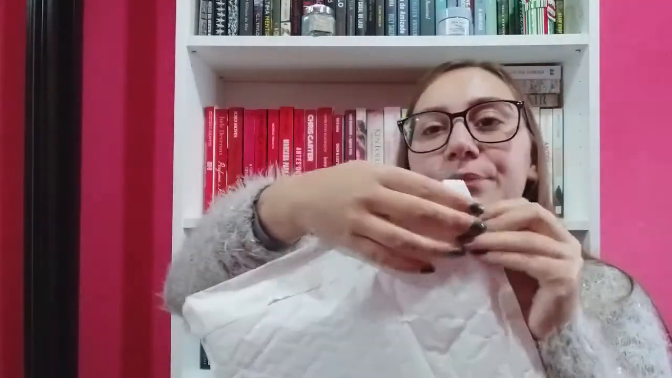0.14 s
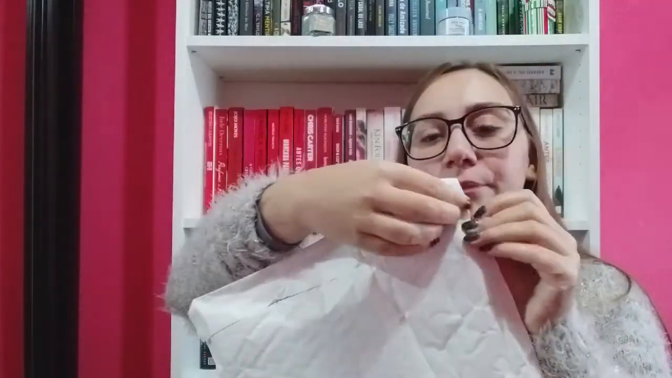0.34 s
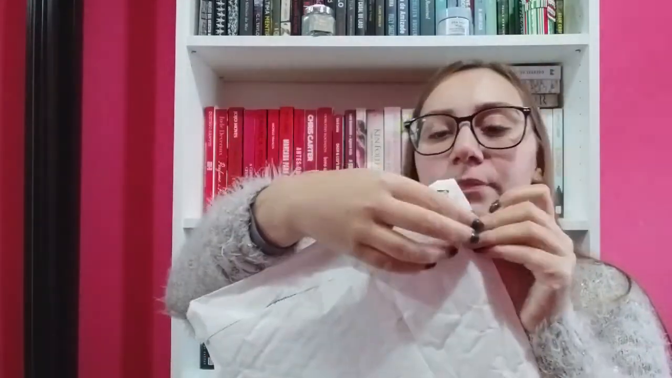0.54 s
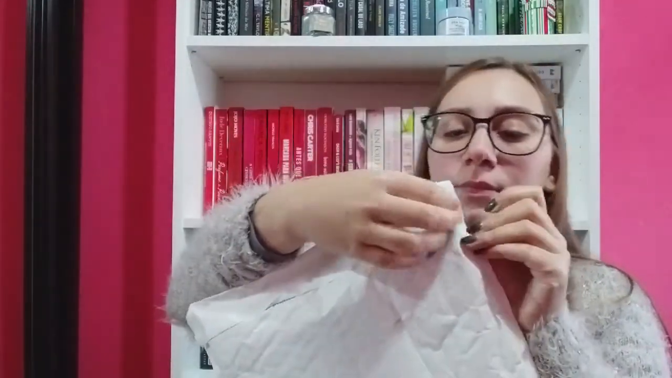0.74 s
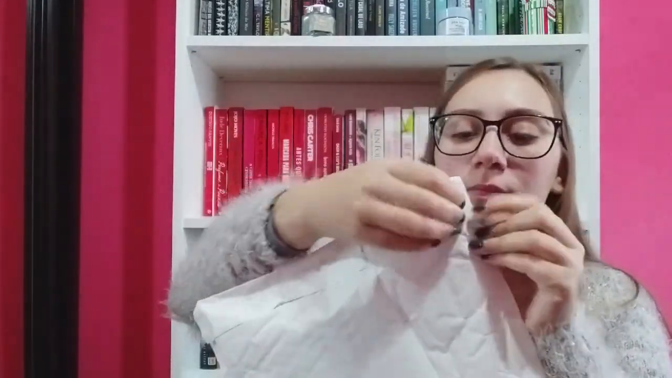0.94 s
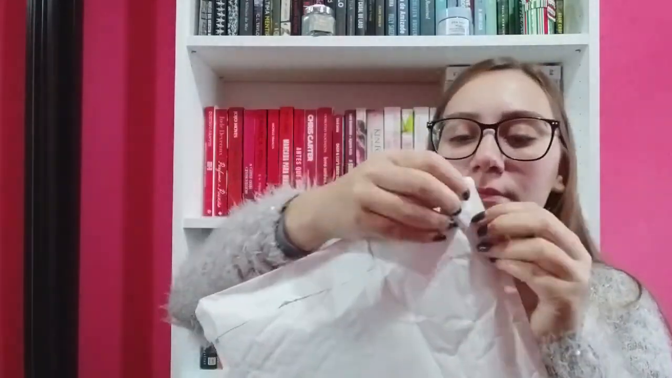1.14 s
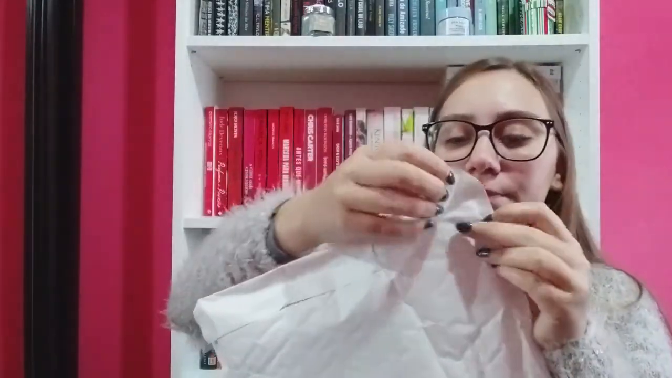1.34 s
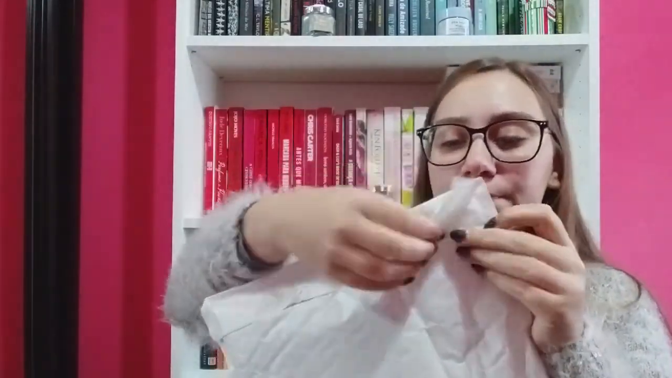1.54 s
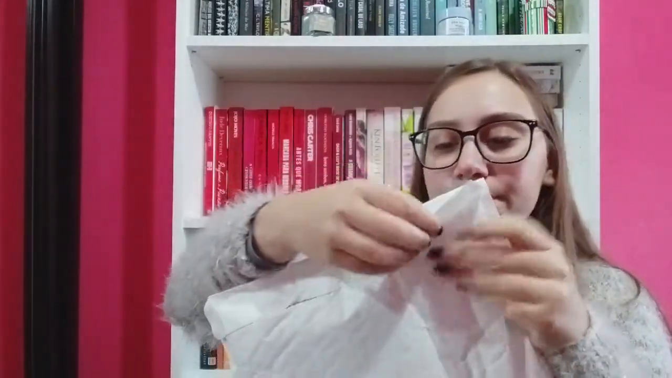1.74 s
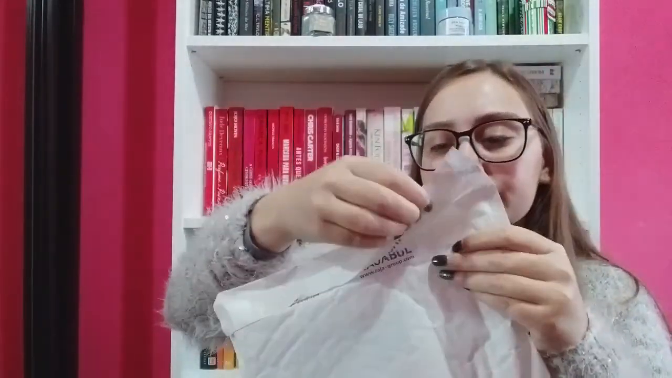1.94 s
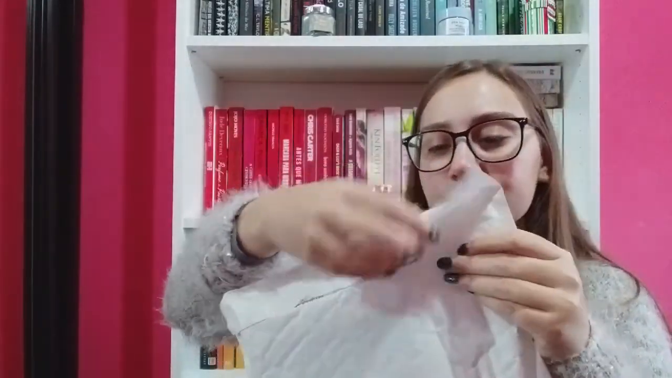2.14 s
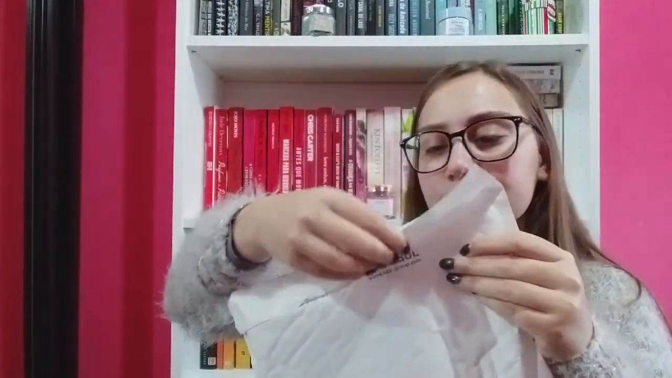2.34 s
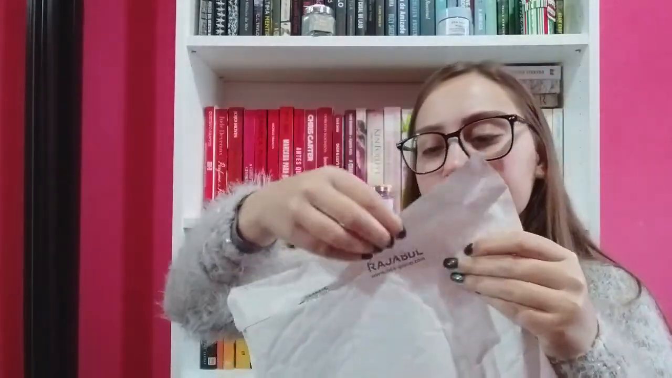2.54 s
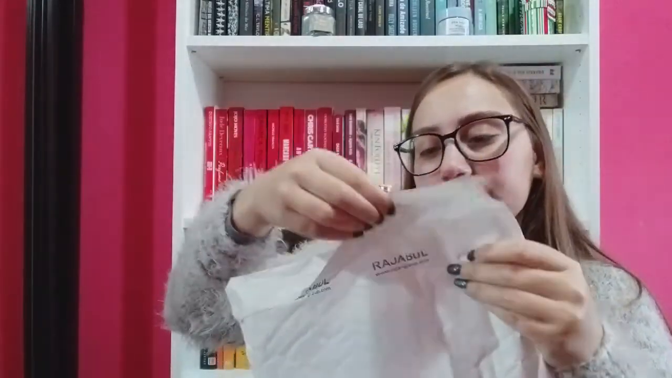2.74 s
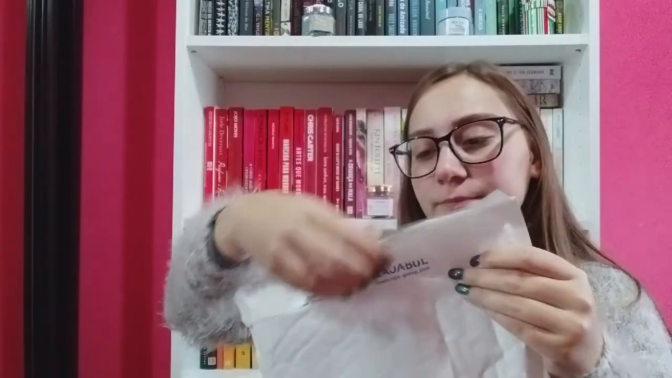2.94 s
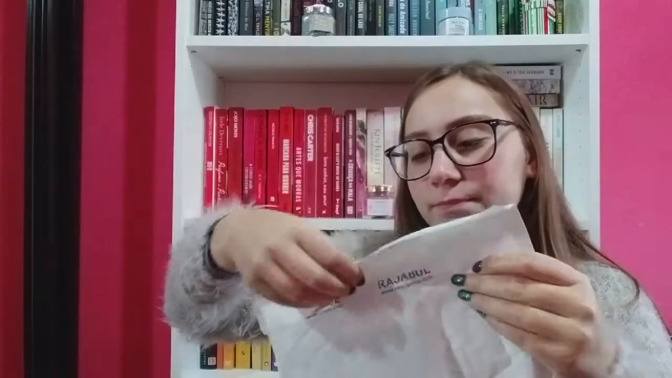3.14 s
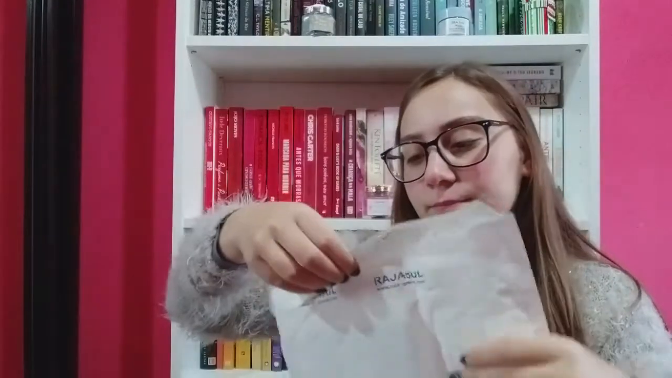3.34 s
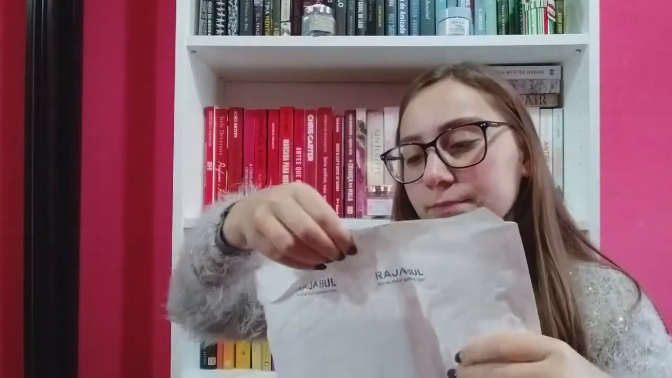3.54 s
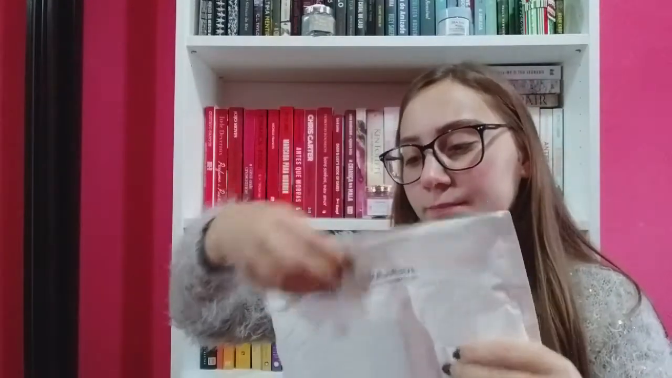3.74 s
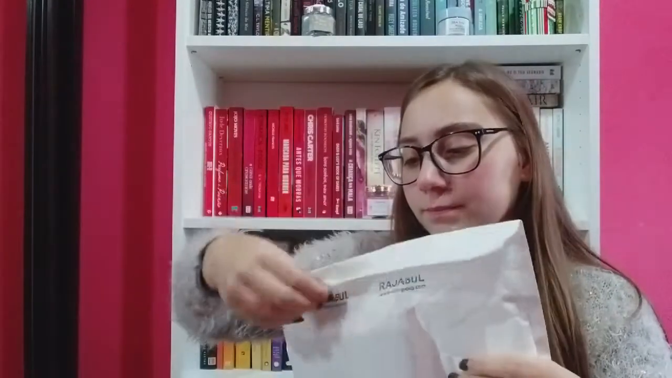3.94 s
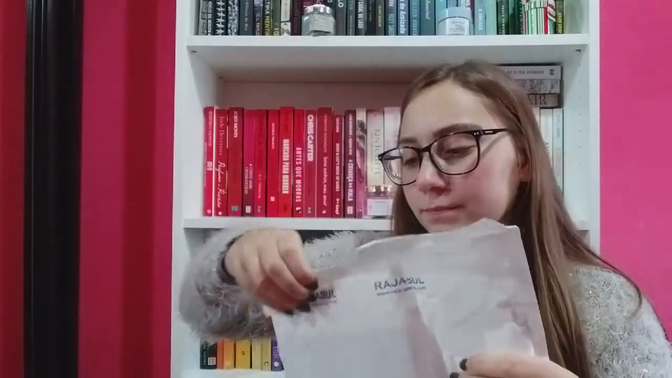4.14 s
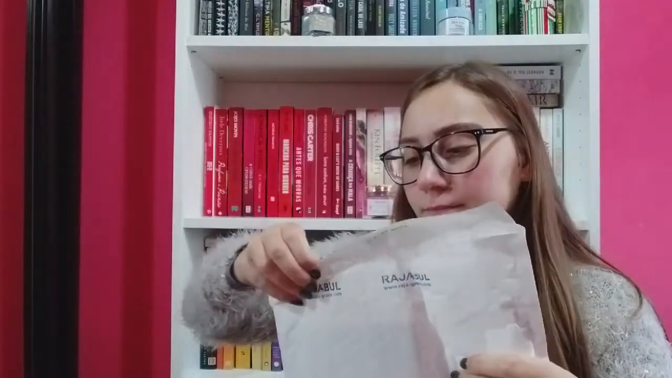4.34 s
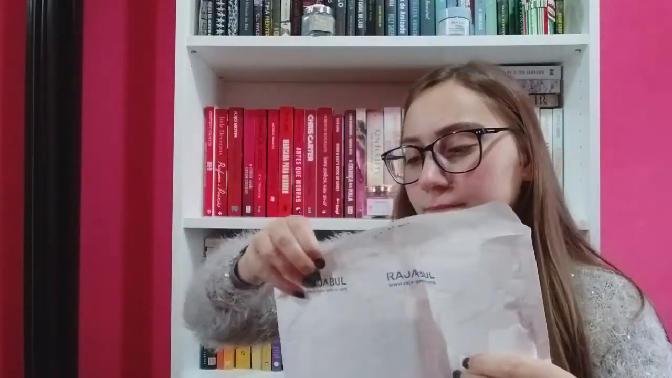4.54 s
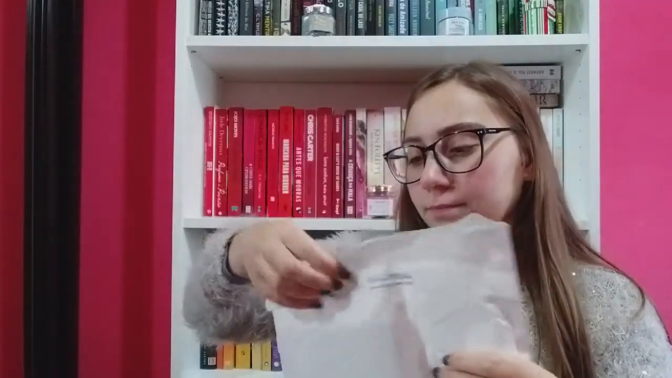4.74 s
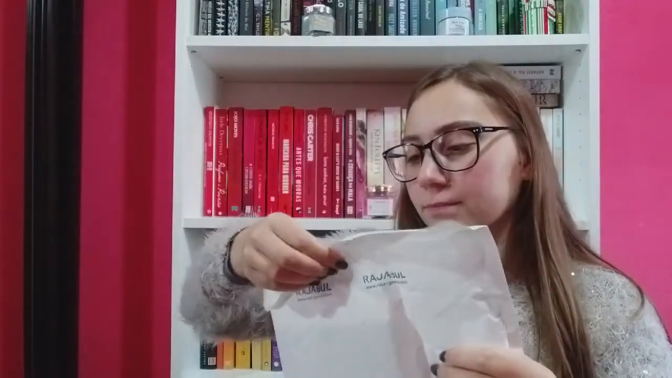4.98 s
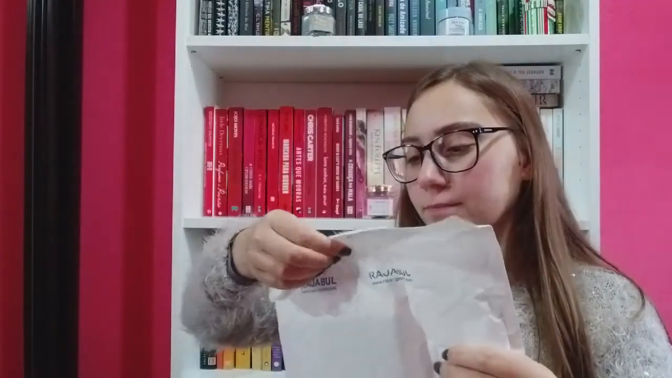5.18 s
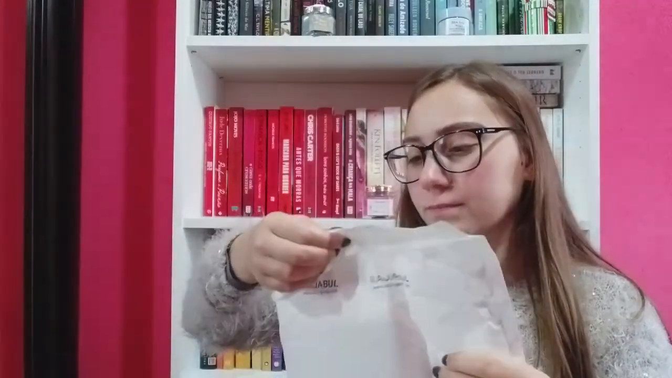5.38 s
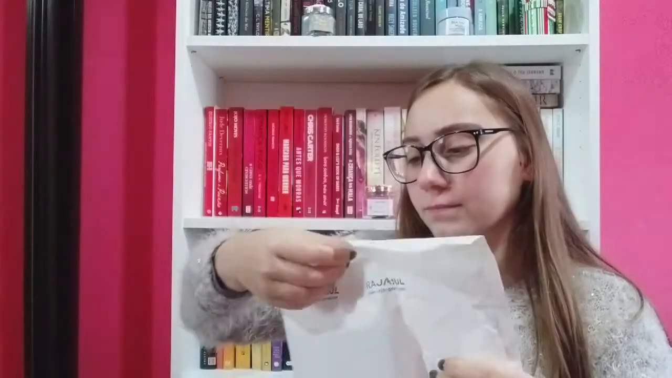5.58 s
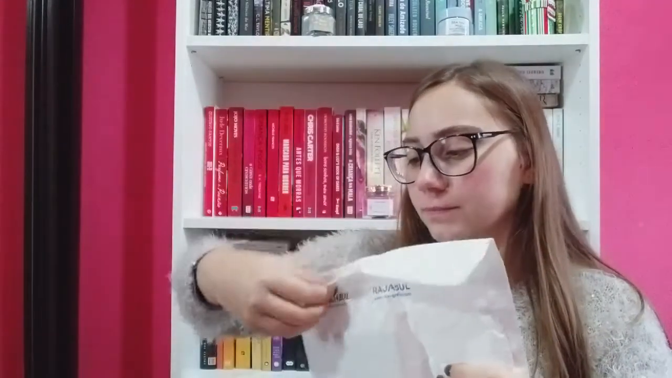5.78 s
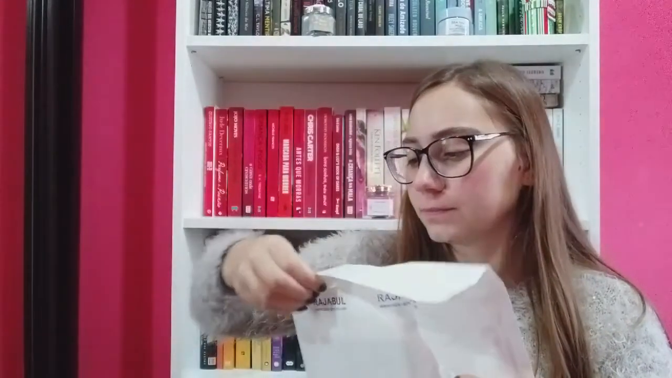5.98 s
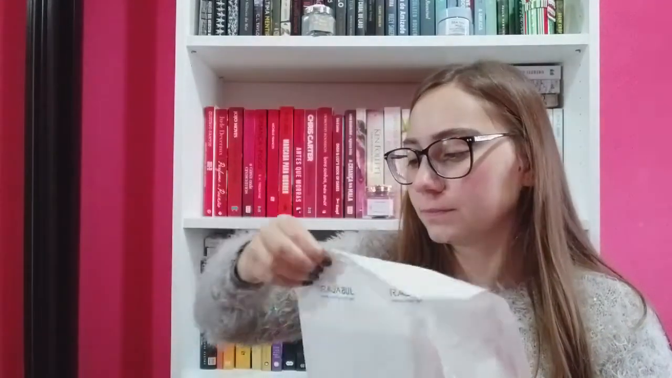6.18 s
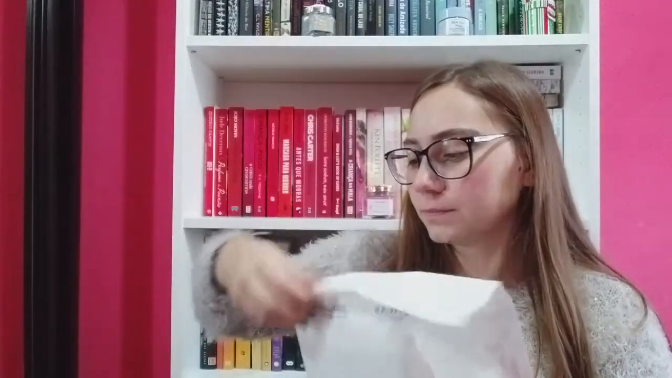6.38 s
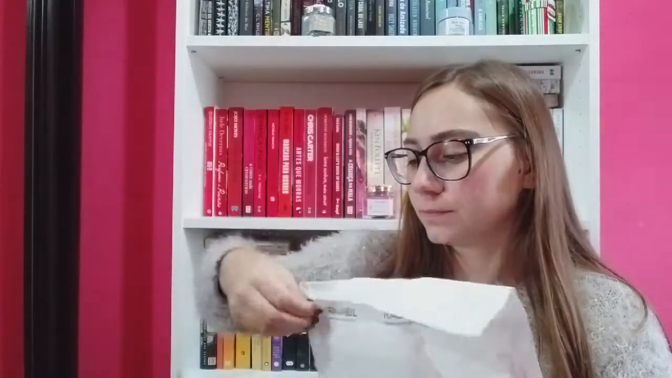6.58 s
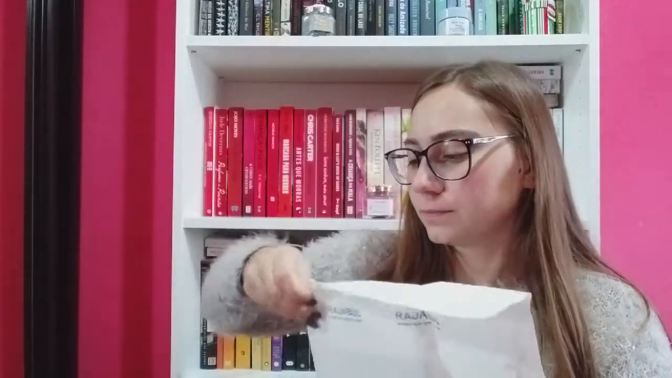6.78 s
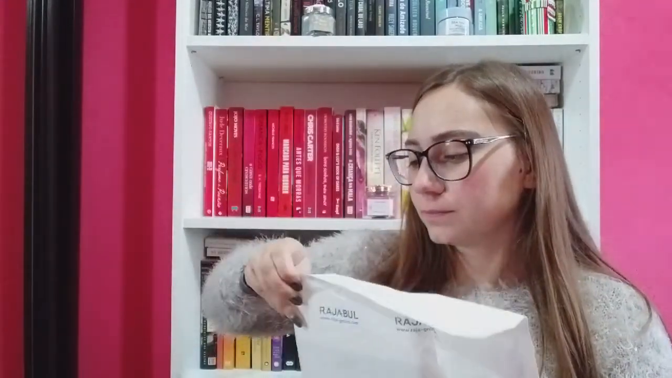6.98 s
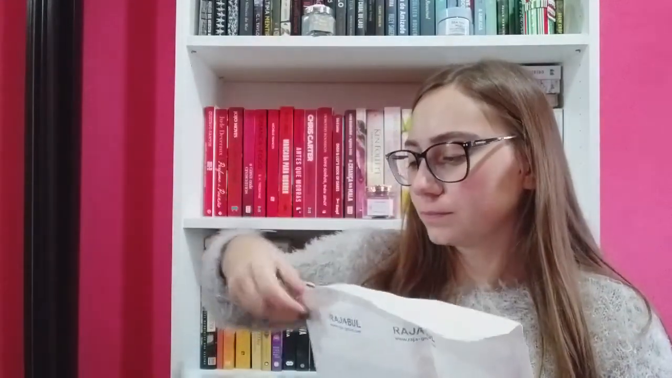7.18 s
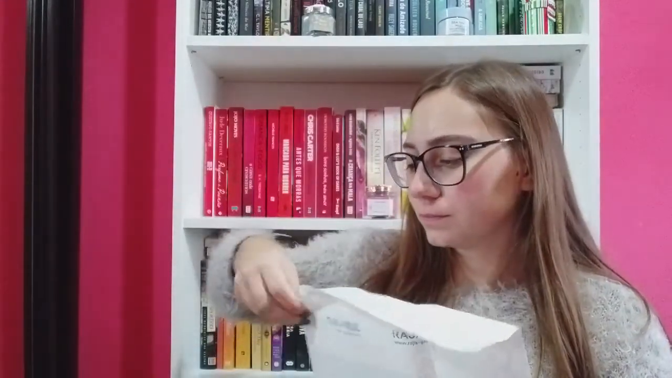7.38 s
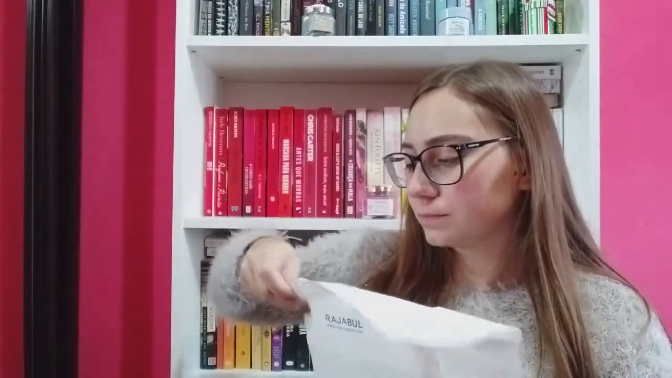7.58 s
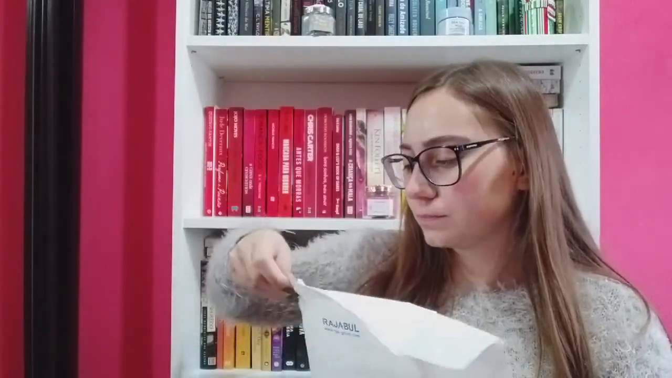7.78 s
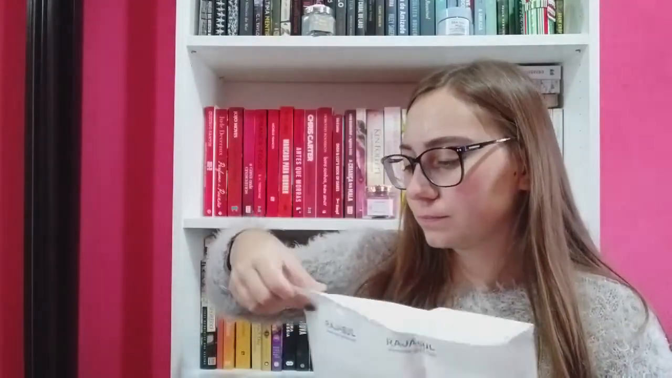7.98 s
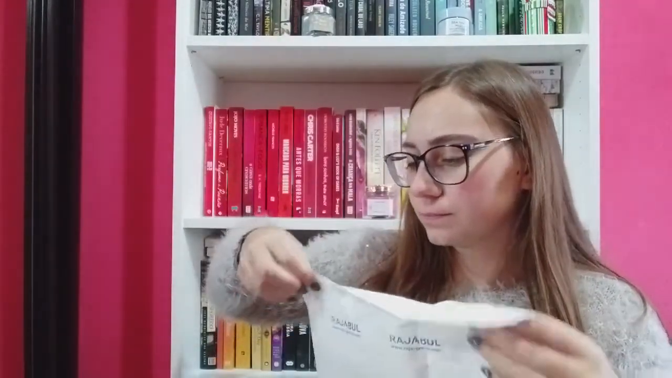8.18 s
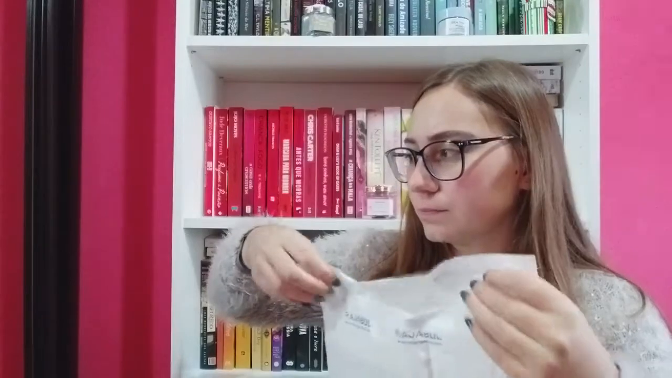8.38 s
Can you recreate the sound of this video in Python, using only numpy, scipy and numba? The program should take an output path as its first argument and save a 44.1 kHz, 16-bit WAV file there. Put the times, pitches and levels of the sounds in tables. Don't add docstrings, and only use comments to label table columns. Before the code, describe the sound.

Hands pull open a stiff padded paper envelope up close, with crisp crackles, sharp snaps and hollow panel pops over faint room hum.

```python
import sys
import numpy as np
from scipy import signal
from scipy.fft import rfft, irfft
from scipy.io import wavfile
from scipy.ndimage import uniform_filter1d
from numba import njit

SR = 44100
rng = np.random.default_rng(int(sys.argv[2]) if len(sys.argv) > 2 else 0)


def file_out(sig):
    cols = np.atleast_2d(sig).T
    lim = np.clip(cols, -1, 1)
    pcm = np.round(lim * 32767).astype(np.int16)
    wavfile.write(sys.argv[1], SR, pcm)


def invert_db(x):
    u = np.asarray(x, float) / 20
    return 10 ** u


N = 371322
SNAP_DELAY_S = .001


def level(x, db):
    return x * invert_db(db) / np.sqrt(np.mean(x ** 2))


def colour(x, points):
    hz, db = np.transpose(points)
    grid_hz = np.maximum(np.fft.rfftfreq(4096, 1 / SR), 1)
    gain_db = np.interp(np.log(grid_hz), np.log(hz), db)
    cepstrum = irfft(np.log(invert_db(gain_db)))
    cepstrum[1:2048] *= 2
    cepstrum[2049:] = 0
    response = irfft(np.exp(rfft(cepstrum)))
    return signal.fftconvolve(x, response)[:len(x)]


def band(x, hz, width_hz):
    return signal.lfilter(*signal.iirpeak(hz, hz / width_hz, fs=SR), x)


def thin(x, hz):
    return signal.sosfilt(signal.butter(2, hz, "high", fs=SR, output="sos"), x)


def walk(rate_hz):
    hold = int(SR / rate_hz)
    steps = np.repeat(rng.standard_normal(N // hold + 1), hold)
    return 1.31 * uniform_filter1d(steps, hold)[:N]


@njit
def grains(s, size, hz, cycles):
    out = np.zeros(N + 9000)
    for k in range(len(s)):
        turn = np.exp((2j * np.pi - np.log(1000.) / cycles[k]) * hz[k] / SR)
        z = size[k] + 0j
        first = int(s[k] * SR)
        last = first + min(int(cycles[k] * SR / hz[k]), 8000)
        for i in range(first, min(last, len(out))):
            z *= turn
            out[i] += z.imag
    return out[:N]


def crackle(count, hz, octaves, cycles, scatter_db, flurry_db):
    when, side = rng.random((count, 2)).T
    centre_hz = np.broadcast_to(hz, N)[(when * N).astype(int)]
    pitch_hz = np.clip(centre_hz * 2 ** (octaves * rng.standard_normal(count)), 60, .42 * SR)
    size = np.sign(side - .5) * invert_db(scatter_db * np.minimum(rng.exponential(size=count), 4))
    size = size * np.sqrt(pitch_hz / centre_hz)
    small_breaks = grains(when * N / SR, size, pitch_hz, np.full(count, cycles))
    return level(small_breaks * invert_db(flurry_db), 0)


def hum():
    # [Hz, dB per Hz]
    spectrum = [(13, -48), (22, -13), (53, -6), (64, -7.5), (85, -2.5), (211, -13.5), (457, -17.5),
                (961, -28), (5170, -22), (16000, -54)]
    return level(colour(rng.standard_normal(N), spectrum), -57.5)


def room(x, places=16):
    # [s, dB]
    echoes = [
        (.0006, -11),
        (.0021, -8),
        (.0066, -13),
        (.0116, -11),
    ]
    # [Hz, s, dB]
    tail_bands = [(300, 0.32, -2.5), (1440, 0.18, -5), (4930, 0.13, -8), (12370, 0.13, -10)]
    t = np.arange(SR // 2) / SR
    swell = np.minimum(t / .008, 1) * (1 - 2 * t)
    share = invert_db(68.0 * np.array([walk(14) for _ in range(places)]))
    out = x
    for part in x * share / np.sqrt(np.sum(share ** 2, axis=0)):
        tail = 0
        for hz, t60_s, db in tail_bands:
            decay = invert_db(-60 * t / min(t60_s, .4))
            wash = band(rng.standard_normal(len(t)), hz, 1.4 * hz) * decay * swell
            wash = wash / np.sqrt(np.sum(wash ** 2))
            tail = tail + invert_db(db) * wash * np.sqrt(2.07 * hz / SR)
        for lag_s, db in echoes:
            tail[int((lag_s + .0004 * rng.random()) * SR)] += invert_db(db)
        out = out + signal.fftconvolve(part, tail)[:N]
    return out


def swings():
    # [s, dB, Hz]
    thuds = [(0.986, -35, 121), (1.24, -38, 96.9), (2.764, -47, 51.1), (2.767, -28, 177),
             (2.956, -25.5, 160), (3.351, -38, 121), (3.841, -52, 199), (3.843, -32, 168),
             (4.063, -30.5, 168), (4.715, -36, 159), (4.964, -32, 177.6), (5.292, -41, 196),
             (6.195, -31, 187), (6.413, -38, 183.8), (6.867, -43, 156), (6.979, -38, 191),
             (7.619, -38, 121), (8.084, -49.5, 136)]
    s, db, hz = np.transpose(thuds)
    return band(grains(s, invert_db(db + 6.5), hz, np.full(len(s), 6.)), 187.0, 160.0)


def pops():
    # [s, dB, Hz]
    panel_pops = [(0.192, -28, 900), (0.321, -28.5, 554), (0.97, -28.5, 460), (1.477, -30.5, 430),
                  (1.508, -24, 900), (1.745, -21, 1010), (1.853, -21, 960), (1.272, -31, 434),
                  (2.411, -30, 450), (2.716, -22.5, 437), (2.776, -15, 442), (2.956, -30, 580),
                  (4.043, -18, 1330), (4.564, -26.5, 440), (4.717, -27, 570), (4.808, -21.5, 840),
                  (4.856, -17, 490), (4.971, -22.5, 820), (5.037, -19, 445), (5.302, -15, 342),
                  (5.449, -27, 810), (5.555, -25, 570), (5.947, -26, 456), (6.398, -26, 860),
                  (6.982, -26, 1010), (7.202, -17, 845), (7.629, -19, 575), (8.09, -24.5, 483.6),
                  (8.186, -23, 900), (8.312, -22.5, 880),
                  (0.361, -38, 458), (1.066, -38, 450), (1.112, -40, 1070), (1.298, -34, 426),
              (1.923, -26.5, 473), (2.004, -23.5, 433), (2.097, -35, 902), (2.152, -37, 431),
              (2.202, -31.5, 410), (2.513, -29.5, 441), (3.343, -33, 484), (3.799, -21.5, 864),
              (3.849, -28, 554), (3.949, -46, 447), (4.055, -24, 418), (4.074, -25, 1270), (4.1, -33, 490),
              (4.171, -33.5, 398), (4.316, -30, 850), (4.753, -38, 872), (4.933, -25, 471),
              (4.994, -25, 571), (5.514, -30, 880), (5.831, -30.5, 574), (6.112, -25, 877),
              (6.417, -23.5, 460), (6.433, -23, 476), (6.95, -35.5, 1230), (7.046, -26, 565),
              (7.107, -27.5, 1010), (7.224, -23, 900), (7.353, -24, 1010), (7.76, -28, 1300),
              (7.795, -36, 458), (8.039, -30.5, 495)]
    # [s, dB, 1]
    stages = [
        (.002, 4.5, 1.2),
        (.004, -7.5, 2),
        (.009, -27.5, .94),
    ]
    s, db, hz = np.transpose(panel_pops)
    flips = 0
    for lag_s, gain_db, ratio in stages:
        flips = flips + grains(s + lag_s, invert_db(db + gain_db), hz * ratio, np.full(len(s), 8.))
    return thin(flips, 146.0)


def strong_breaks():
    # [s, dB, Hz, dB]
    cracks = [(0.812, -17, 3220, -4.5), (.9692, -15.5, 3030, -22), (1.0669, -20.5, 3020, -2),
              (1.2341, -15, 3370, -5), (1.911, -16, 1437, -13), (1.9345, -10.5, 6100, -4),
              (2.0399, -16, 5400, -2.5), (2.15, -19.5, 2350, -8), (2.2119, -16, 3500, -14),
              (2.695, -15, 3560, -21), (2.7826, -1, 5140, -5), (2.9212, -9, 2950, -3),
              (4.0427, 0.5, 4900, -14), (4.234, -16, 4770, -9), (4.346, -23, 7060, 2.5),
              (5.214, -5.5, 6090, -4.5), (5.2617, -12, 5950, -5), (5.5134, -25, 4140, -24),
              (6.1323, -20, 5030, -3), (6.776, -9, 3400, -9.5), (6.8552, -3, 3850, -16),
              (7.3531, -7, 2670, -41), (7.49, -22, 6700, -7), (4.7208, -15, 2860, -18),
              (7.8137, -17.5, 3500, -20), (7.314, -26, 4500, -22)]
    # [s, dB, Hz]
    ticks = [(.194, -16.5, 3830), (1.2152, -15, 5300), (1.6418, -9.5, 4070), (1.8537, -17, 5400),
             (1.9583, -13, 3950), (2.2447, -5.5, 4970), (2.485, -16.5, 4090), (2.5274, -5, 4300),
             (2.699, -8, 6960), (2.8718, -28, 5300), (3.3417, -18.5, 3630), (3.4447, -14, 4900),
             (3.535, -3, 4250), (3.773, -15.5, 3570), (4.0545, -5, 3340), (4.481, -23, 4730),
             (4.7321, -11, 4793), (4.9238, -12, 3500), (4.9915, -15, 6260), (5.0429, -10.5, 6300),
             (5.6902, -12, 6600), (5.7534, -9, 3760), (6.3998, -13, 5520), (7.5235, -12.5, 6700),
             (7.6092, -16, 5830), (7.866, -14.5, 3850), (8.312, -12.5, 4700), (6.0454, -16, 6200)]
    # [s, dB, Hz]
    folds = [(1.4085, -19.5, 1680), (1.4735, -23.5, 2160), (1.5081, -19, 1560), (1.7457, -19, 1700),
             (1.8043, -20, 1280), (2.0048, -9, 2410), (2.0977, -25.5, 1570), (2.387, -19, 2620),
             (2.7166, -1.5, 2910), (2.958, -18, 1740), (3.1304, -11, 2100), (3.439, -11, 2900),
             (3.6333, -11, 1750), (3.894, -12, 2840), (4.0733, -11.5, 1620), (4.565, -3.5, 2850),
             (4.7541, -15.5, 1720), (4.846, -15, 2100), (4.971, -18.5, 1480), (5.8576, -9.5, 3340),
             (5.947, -11, 2920), (6.4207, -18.5, 2300), (6.443, -9.5, 1570), (6.6849, -19, 1440),
             (7.211, -14, 2800), (7.2218, -14, 825), (7.6306, -4, 2000), (8.1274, -13.5, 2040),
             (8.1328, -4, 2560), (0.89, -28, 1180)]
    tick_treble_db, fold_treble_db = -24, -29
    return cracks + [(*r, tick_treble_db) for r in ticks] + [(*r, fold_treble_db) for r in folds]


def small_breaks():
    # [s, dB, Hz]
    pricks = [(0.362, -22.5, 5120), (0.712, -32, 1640), (0.758, -24, 6900), (0.907, -26, 2040),
              (1.052, -21, 6010), (1.112, -21, 1630), (1.169, -21, 5780), (1.185, -16, 7520),
              (1.195, -17, 5130), (2.053, -20, 4110), (2.581, -26, 4780), (3.415, -13, 3530),
              (3.476, -13, 4280), (3.749, -18.5, 3150), (3.789, -16, 3920), (4.936, -17, 1720),
              (5.166, -22, 3820), (5.604, -18, 4140), (5.638, -28, 5190), (5.763, -15, 2190),
              (5.961, -13, 2060), (6.732, -24, 2000), (7.76, -20, 1320), (7.896, -17.5, 1323),
              (7.944, -20.5, 6540),
              (0.956, -31, 3590), (1.174, -24, 5120), (1.728, -27, 1720), (2.6514, -36, 5180),
             (2.722, -3, 6270), (2.7564, -9, 5260), (2.8833, -19, 6100), (3.3477, -15.5, 3560),
             (3.88, -15, 2890), (4.0989, -21, 1680), (4.463, -23, 5200), (4.911, -14, 5090),
             (5.0883, -29, 4410), (5.2274, -8, 3000), (5.668, -17, 4520), (5.71, -16, 4440),
             (5.7434, -15, 4070), (6.1214, -22, 5010), (6.1564, -23, 5300), (6.163, -11.5, 5280),
             (6.467, -16, 1710), (6.645, -20, 1580), (6.6696, -20.5, 1690), (6.8964, -16, 4610),
             (7.1043, -32, 3730), (7.1212, -20, 2280), (7.4934, -17, 6610), (8.1948, -18, 1710)]
    # [s, dB, Hz, dB]
    rips = [(2.7531, 1, 4500, -7), (5.2772, -10, 8600, -8), (2.9315, -14, 5000, -14),
            (2.9582, -14, 7000, -10), (7.861, -21, 4200, -20), (2.868, -22, 5000, -20),
            (5.292, -16, 5400, -10), (5.3030, 2.5, 6700, -12), (4.034, -18, 1600, -25),
            (5.296, -3, 8900, -14), (9, -3, 6100, -20), (4.2, -14, 2900, -19), (6.1717, -7, 5700, -10),
            (6.192, -2.5, 4100, -18)]
    gain_db, treble_db = -2.5, -30
    return [(s, db + gain_db, hz, treble_db) for s, db, hz in pricks] + rips


def snaps():
    s, db, hz, treble_db = np.transpose(strong_breaks() + small_breaks())
    s = s + SNAP_DELAY_S
    count = len(s)
    sign = np.sign(rng.standard_normal(count))
    out = grains(s, sign * invert_db(db + 1.5), hz, np.full(count, 4.6))
    out += grains(s, sign * invert_db(db + treble_db + 12.0), np.full(count, 12500.), np.full(count, 5.))
    chance = rng.random((count, 6, 3))
    late_s = .0005 + .008 * chance[..., 0] ** 2
    size = invert_db(db[:, None] - 5.5 - 1300 * late_s - 2.2 * chance[..., 1])
    pitch_hz = np.clip(hz[:, None] * 2 ** (1.3 * (chance[..., 2] - .3)), 60, .42 * SR)
    after_s = (s[:, None] + late_s).ravel()
    out += grains(after_s, size.ravel(), pitch_hz.ravel(), np.full(late_s.size, 4.))
    return thin(thin(out, 620.0), 400.0)


def effort():
    # [s, dB, dB, s per 10 dB, s per 10 dB]
    tugs = [(0, -34, -16.5, .15, .26), (.36, -43, -5.5, .2, .06), (.578, -47.5, -12, .1, .06),
            (.838, -47.5, -26, .13, .1), (.978, -40, -5, .03, .082), (1.072, -38.5, -10, .05, .3),
            (1.266, -27, -9, .046, .05), (1.305, -30.5, -9, .145, .03), (1.548, -39.5, -4, .1, .14),
            (1.658, -42, -9.5, .18, .05), (1.874, -32, -11.5, .14, .08), (1.968, -23, -5.5, .086, .035),
            (2.248, -35, -3, .07, .07), (2.438, -35, -4.5, .1, .14), (2.523, -30, -8.5, .08, .03),
            (2.645, -38, -18.5, .15, .07), (2.752, -20, -5, .035, .04), (2.94, -36, -1.5, .08, .25),
            (3.173, -38, -6.5, .4, .05), (3.433, -30.5, -5, .1, .12), (3.554, -31, -10.5, .2, .06),
            (3.637, -37, -30, .02, .045), (3.812, -29, -3, .045, .12), (3.852, -30, -.5, .07, .1),
            (4.058, -25, -5, .019, .04), (4.306, -39, -7, .3, .11), (4.57, -39.5, -24, .2, .09),
             (4.736, -30, -5, .045, .26), (4.86, -28, -8, .08, .03), (5.104, -33, -12.5, .13, .25),
             (5.31, -19, -4, .06, .033), (5.533, -34.5, -6.5, .17, .14), (5.786, -35, -7, .3, .3),
             (5.933, -38.5, -10, .1, .1), (6.106, -29, -10, .093, .1), (6.195, -19.5, -9, .04, .034),
             (6.425, -24, -4.5, .044, .055), (6.677, -34, -6.5, .04, .09), (6.776, -36, -14.5, .13, .2),
             (6.868, -22, -15, .012, .06), (7.006, -29, -4.5, .07, .03), (7.175, -30.5, -6.5, .05, .13),
             (7.366, -38, -15.5, .04, .04), (7.558, -36, -3, .11, .34), (7.645, -18, -18.5, .022, .046),
             (7.87, -41.5, -4, .35, .275), (8.145, -31, -7.5, .19, .23), (8.321, -37.5, -3, .064, .4),
            (.53, -49.5, -17, 0.4, 0.3), (2.722, -20.5, -4.5, 0.0156, 0.12),
             (2.783, -23, -11.5, 0.153, 0.0221), (3.05, -39, -1.5, 0.63, 0.22), (4.47, -41.5, -8, 1.5, 0.6),
             (5.295, -29, -2, 0.0658, 0), (6.165, -32, -9, -0.05, 0.15), (6.358, -31, -11, -0.01, 0.18),
             (6.545, -33.5, -8, 0.36, -0.01), (7.038, -35.5, -6, 0.5, 0), (7.12, -36, -6, 0.1, 0.4),
             (7.632, -17, -8.5, 0, 0.0437), (7.97, -37, -9, .15, -0.1), (6.64, -39.5, -6, -0.1, .1),
             (2.886, -36, -12, 0.2, 0.05), (4.855, -26.5, -6, 0.05, -0.01), (6.92, -29.5, -18, 0.12, 0.11),
             (2.695, -23, -12, 0.0231, 0.0745), (7.612, -27, -7, 0, -0.01)]
    # [s, dB, s]
    dips = [(0.673, -5, 0.034), (1.372, -1, 0.02), (2.66, -8.5, 0.025), (2.852, -8.5, 0.03),
            (3.26, -2.5, 0.038), (3.705, -2, 0.027), (4.418, -3.5, 0.026), (4.666, -4, 0.024),
            (4.96, -3, 0.0098), (5.012, -1, 0.012), (5.416, -2, 0.023), (6.29, -5.5, .02),
            (6.592, -8, 0.023), (7.088, -4, 0.019), (7.44, -4, 0.022), (8.288, -3.5, 0.018)]
    flex_steepness = 1.23
    t, crease_db, flex_db = np.arange(N) / SR, -99, -99
    for s, db, over_db, rise_s, fall_s in tugs:
        sag_db = 10 * np.where(t < s, (s - t) / max(rise_s, .01), (t - s) / max(fall_s, .01))
        crease_db = np.maximum(crease_db, db - sag_db)
        flex_db = np.maximum(flex_db, db + over_db - flex_steepness * sag_db)
    dip_db = sum(db * np.exp(-((t - s) / max(half_s, .005)) ** 2) for s, db, half_s in dips)
    return crease_db + dip_db, flex_db + dip_db


def taut(db):
    strain_s = 0.0144
    held = db.copy()
    for s in np.transpose(strong_breaks())[0] + SNAP_DELAY_S:
        strain = slice(int((s - strain_s) * SR), int(s * SR))
        held[strain] = np.minimum(held[strain], held[strain.start])
    return held


def air_pocket(flurry):
    # [Hz, Hz, dB]
    shut_modes = [(160, 450, -4), (441, 29, 7.5), (570, 54, -6), (1000, 120, 8.5)]
    # [Hz, Hz, dB]
    open_modes = [(171, 186, -1), (381, 22, 5), (472, 24, 5), (560, 73, 10), (907, 59, 7.5), (1010, 39, 0)]
    opens_s, opening_s = 2.84, 0.36
    push = crackle(count=5000, hz=560., octaves=.65, cycles=2.5, scatter_db=2.8, flurry_db=1.5 * flurry)
    shut = sum(invert_db(db) * band(push, hz, width_hz) for hz, width_hz, db in shut_modes)
    opened = sum(invert_db(db) * band(push, hz, width_hz) for hz, width_hz, db in open_modes)
    gape = np.clip((np.arange(N) / SR - opens_s) / opening_s + .5, 0, 1)
    pocket = (1 - gape) * shut + gape * opened
    sheet = invert_db(-8.5) * band(push, 300.0, 750.0)
    return level(thin(pocket + sheet, 110.0), -3.5)


def handling():
    # [s, Hz, dB]
    paper_grain = [(0, 4900, -13.5), (.5, 3720, -10.5), (1.098, 5130, -5.5), (1.3, 3840, -8.5),
                   (1.95, 4200, -12), (2.3, 3770, -12.5), (2.72, 4630, -14), (3.1, 3700, -13.5),
                   (3.5, 4100, -12), (4.3, 3920, -14), (4.9, 3760, -15.5), (5.1, 4200, -7),
                   (5.6, 3970, -17), (6.17, 4550, -12), (6.6, 3600, -15), (7.35, 3300, -12),
                   (7.55, 4070, -13), (8.42, 3840, -9)]
    crease_db, flex_db = (taut(db) for db in effort())
    s, *columns = np.transpose(paper_grain)
    colour_hz, fibre_db = (np.interp(np.arange(N) / SR, s, c) for c in columns)
    flurry = walk(60)
    drum = air_pocket(flurry)
    grain_hz = 3670.0 * (colour_hz / 4000) ** 1.12
    creases = crackle(count=24000, hz=grain_hz, octaves=0.69, cycles=3.3, scatter_db=3.0,
                      flurry_db=1.7 * flurry)
    fibres = crackle(count=40000, hz=13500.0, octaves=0.21, cycles=3.7, scatter_db=2.5,
                     flurry_db=2.0 * flurry)
    prickle = crackle(count=2500, hz=1.17 * grain_hz, octaves=0.43, cycles=4.0, scatter_db=3.5,
                      flurry_db=1.4 * flurry)
    creases = thin(thin(creases + invert_db(-8.0) * prickle, 400.0), 300.0)
    hiss = invert_db(fibre_db + 9.) * thin(fibres, 2300.0)
    return invert_db(crease_db - 4.0) * (creases + hiss) + invert_db(flex_db) * drum


def scene():
    # [Hz, Hz, 0-1]
    cancelled = [(273, 33, 0.29), (736, 144, 0.13)]
    paper = room(handling() + snaps() + pops() + swings())
    for hz, width_hz, share in cancelled:
        paper = paper - min(share, 1) * band(paper, hz, width_hz)
    return (invert_db(-0.5) * thin(paper, 84.0) + hum())[None]


def low_pass(x):
    return signal.sosfilt(signal.butter(12, 16510, fs=SR, output="sos"), x)


def record(dry):
    # [Hz, dB]
    mic = [(30, -14.5), (100, 0), (300, -1.5), (3000, 2.5), (6000, 6), (7600, 7), (8900, -3.5), (11000, 0),
           (16000, -3.5)]
    top_cut = signal.ellip(12, .2, 80, 15720, fs=SR, output="sos")
    heard = signal.sosfilt(top_cut, colour(dry[0], mic))
    return low_pass(np.clip(heard, -1, 1)[None])


dry = scene()
out = record(dry)
file_out(out)
```